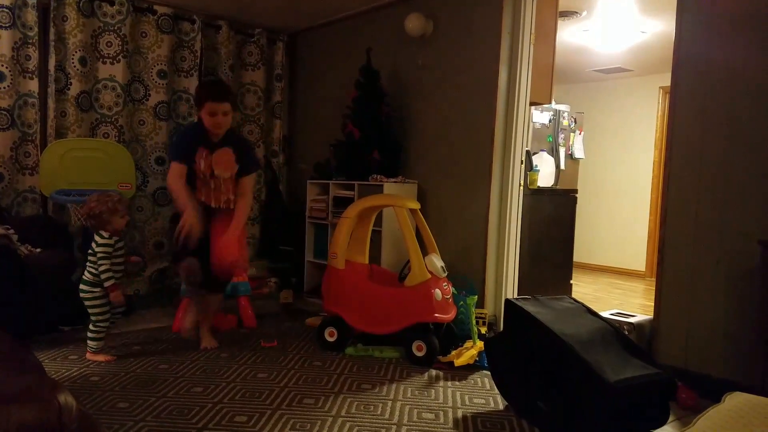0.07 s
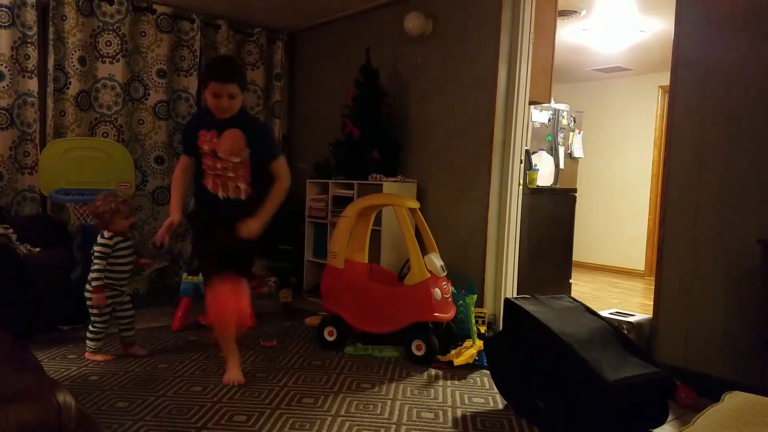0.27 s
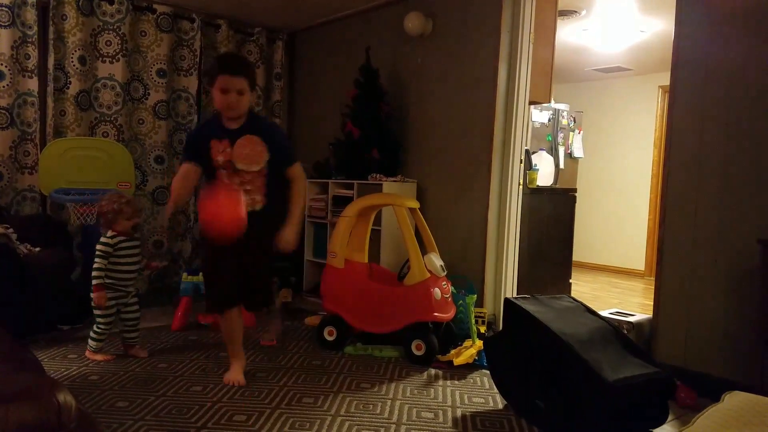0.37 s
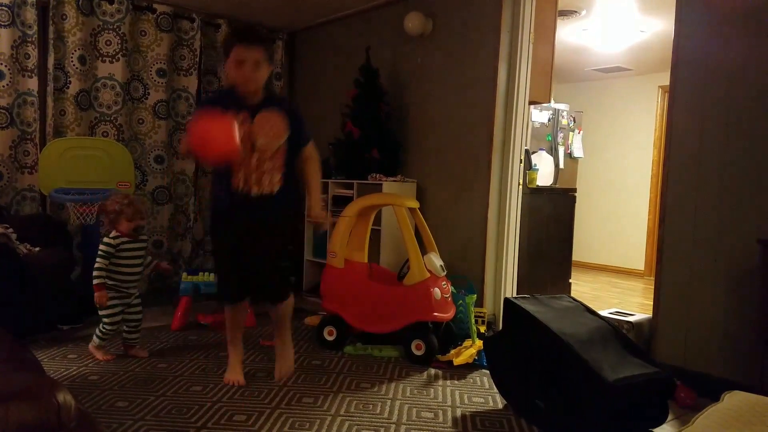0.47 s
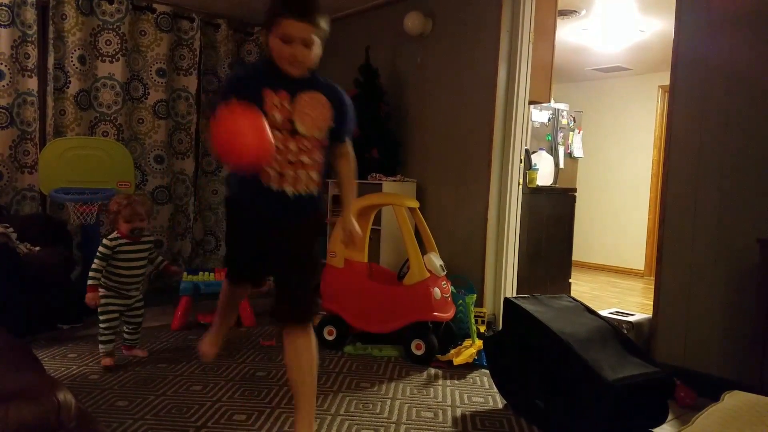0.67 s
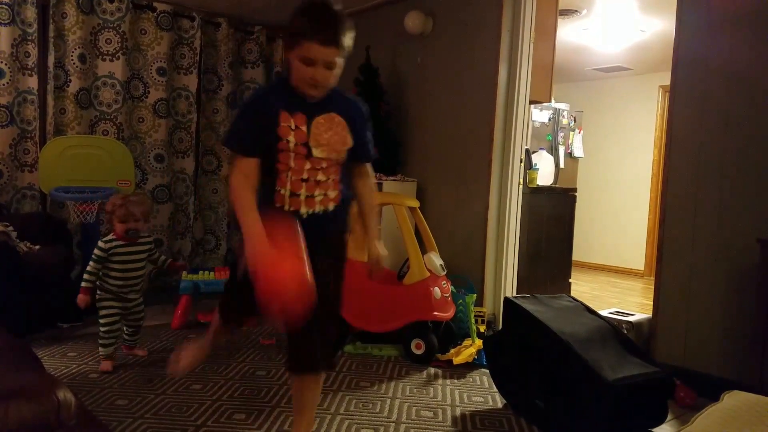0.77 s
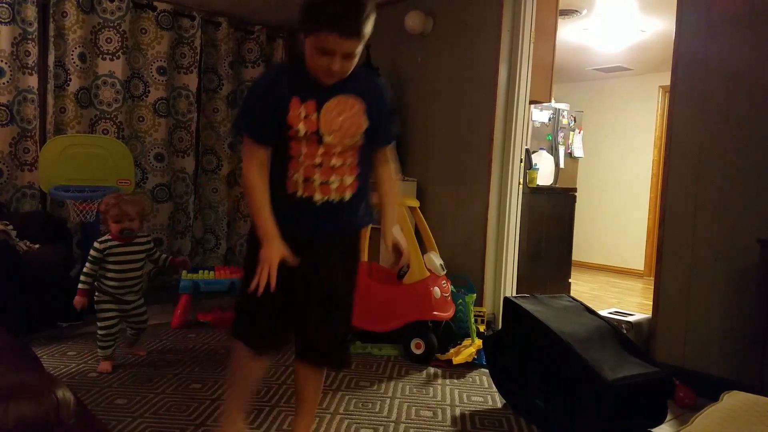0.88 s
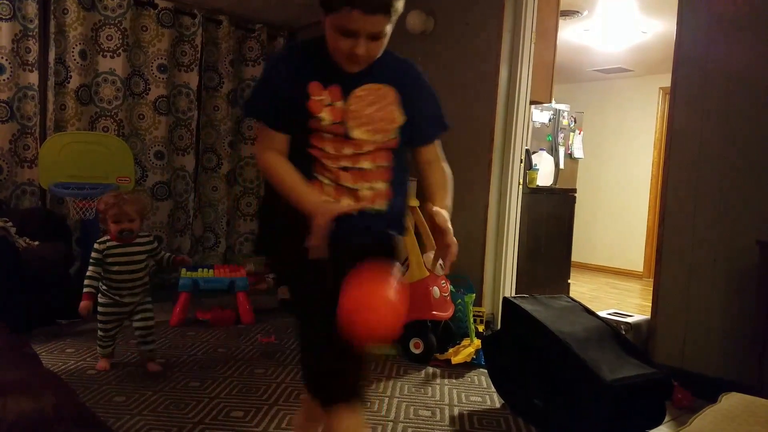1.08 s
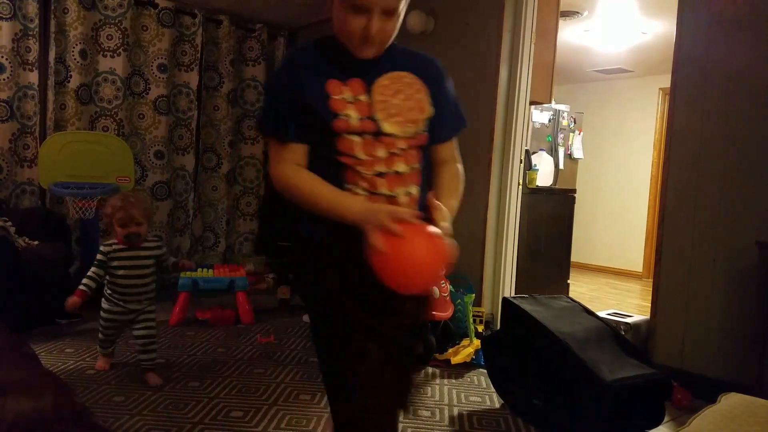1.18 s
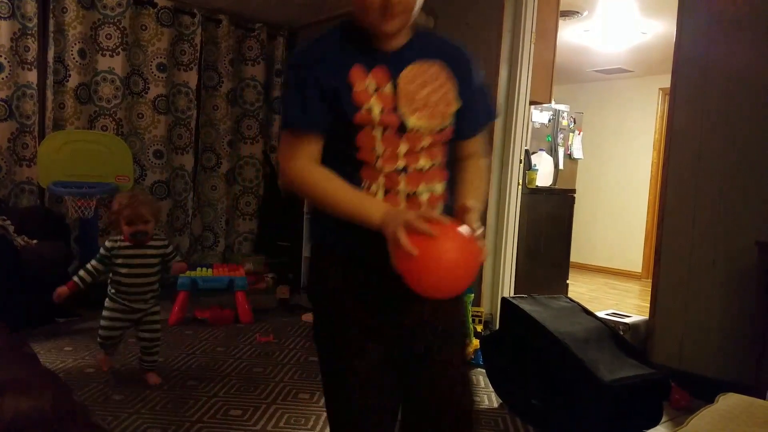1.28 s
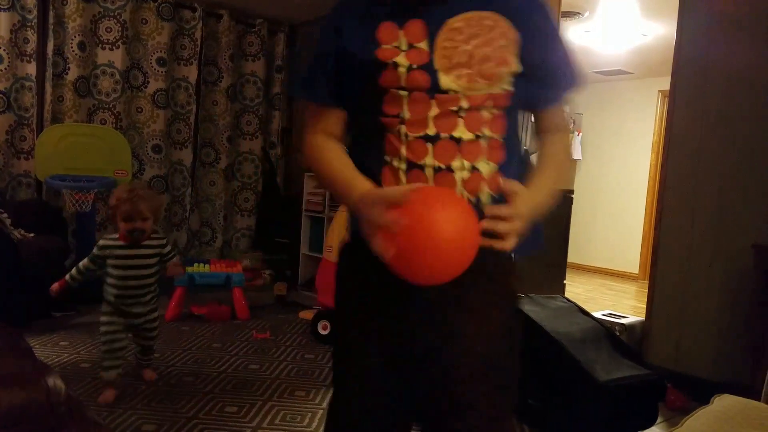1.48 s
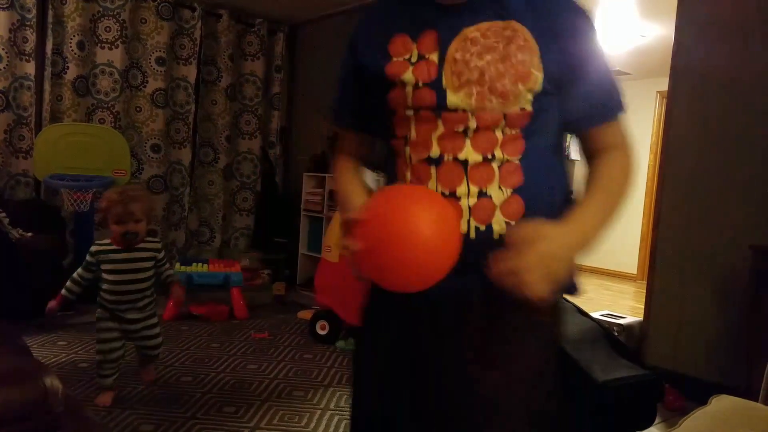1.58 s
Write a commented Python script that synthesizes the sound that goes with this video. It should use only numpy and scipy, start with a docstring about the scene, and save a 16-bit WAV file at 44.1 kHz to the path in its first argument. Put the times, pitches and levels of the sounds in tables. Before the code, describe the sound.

An air-filled ball bounces twice on a carpeted floor, each low thud following a palm slap and booming briefly in a quiet room. Hands then catch it hollowly, amid faint barefoot steps and clothing rustle. The right side sounds brighter.

```python
"""Over a quiet living-room tone, a palm slaps an air-filled rubber ball down, while bare feet and clothes
move softly. The ball strikes the carpet with a thud, the air inside it pings, the low ceiling reflects
the impact and the room booms. A hand meets the rising ball and slaps it down again; after this second
bounce two hands catch it with a hollow sound. A last footfall and rustles of clothing follow.
Throughout, the right microphone hears more treble than the left."""
import sys
import numpy as np
from scipy import signal
from scipy.fft import rfft, irfft, next_fast_len
from scipy.io import wavfile

SR = 44100
rng = np.random.default_rng(int(sys.argv[2]) if len(sys.argv) > 2 else 0)


def digitize_waveform(pressure):
    """Quantize a signal to 16-bit integers and store it at the path in sys.argv[1].

    Rows of a 2-D input are taken as channels; values are limited to [-1, 1].
    """
    field = np.atleast_2d(pressure).T
    bounded = np.clip(field, -1, 1)
    quanta = np.round(bounded * 32767).astype(np.int16)
    wavfile.write(sys.argv[1], SR, quanta)


N = 72765
RESPONSE_SAMPLES = 16384

# Spectra of the steady background, rubbing cloth and a sole on carpet: frequency_hz, gain_db
ROOM_TONE_SPECTRUM = [(20, -36), (50, 0), (120, 1), (250, -3.5), (500, -8.5), (1000, -16), (2500, -16.5),
                      (5000, -27), (10000, -30), (15500, -25.5)]
CLOTH_SPECTRUM = [(100, -6), (400, 3), (1000, -1.5), (2500, 0.5), (4500, -6), (6800, -8.5), (8200, -1),
                  (9500, -12.5), (15000, -7.5)]
SCUFF_SPECTRUM = [(200, 5.5), (3000, -7), (7000, -7.5), (14000, -4.5)]
# Spectra of contact with palm, finger, floor and receiving hands: frequency_hz, gain_db
SLAP_SPECTRUM = [(50, -26), (200, 8), (450, -1), (1100, 0), (2000, -1), (4000, -3), (6500, -12),
                 (10000, -30), (15000, -48)]
TICK_SPECTRUM = [(100, -42), (1500, -8.5), (5000, 2.5), (7400, -2.5), (8400, 4), (9800, -8), (15000, -6.5)]
THUD_SPECTRUM = [(20, -56), (45, -34), (75, -4.5), (130, -2), (300, 4), (700, -1), (1500, -7),
                 (2600, -12.5), (4500, -22.5), (8000, -34.5), (15000, -49)]
CATCH_SPECTRUM = [(50, -26.5), (190, 8.5), (330, 1), (560, 2.5), (1200, -3.5), (2500, -10.5), (4500, -15),
                  (9000, -27), (15000, -7)]
# Hands driving, then receiving the ball: start_s, gain_db, cutoff_hz, push_db, tick_db, ping_db
SLAPS = [(0.001, -8, 2600, -36, -61, 4.5), (0.7413, -16, 4000, -61, -54, 16.5),
         (0.748, -2.5, 5000, -34, -24, 1), (0.7536, -4, 8900, -64, -20.5, -22)]
TOUCHES = [(0.552, -14, 6900, -44, -35.5, -1), (1.1955, -8, 4030, -38.5, -46, -29),
           (1.201, -6, 6050, -32, -24, -7.5)]
# Modes of the air inside the ball: pitch_hz, t60_s, floor_struck_db, hand_struck_db
BALL_MODES = [(1154, 0.07, -41, -40), (1630, 0.23, -56.5, -60), (1741, 0.078, -54, -44),
              (1812, 0.058, -37.5, -68), (2331, 0.099, -52, -71), (2355, 0.19, -64, -53.5),
              (2662, 0.069, -48.5, -53.5), (2897, 0.051, -58, -43), (3570, 0.074, -59, -56),
              (3940, 0.058, -55.5, -73), (4346, 0.11, -65, -54.5)]
# Bare footfalls: start_s, level_db
FOOTFALLS = [(0.02, -48.5), (0.121, -47.5), (0.44, -46), (0.926, -66), (1.25, -48)]
# Gaussian swells of cloth noise: peak_s, sigma_s, level_db
RUSTLES = [(.19, 0.15, -63), (0.478, 0.052, -58.5), (.59, 0.014, -63), (.89, 0.14, -61),
           (1.172, 0.033, -58.5), (1.308, 0.056, -57), (1.612, 0.048, -56)]
# Floor impacts: start_s, gain_db, cutoff_hz, thump_db, echo_delay_s, echo_db, ping_db, room_db
BOUNCES = [(0.2481, 13.5, 7700, -5, 0.0051, -2, -5, -0.5), (0.9817, 11, 3920, 5, 0.0068, -0.5, -4.5, 1)]
# Modes of floor and room: pitch_hz, t60_s, first_bounce_db, second_bounce_db
ROOM_MODES = [(103.3, 0.27, -21, -22.5), (132.7, 0.14, -17, -16), (155.5, 0.26, -29, -26.5),
              (178.4, 0.09, -12.5, -30), (248, 0.11, -49, -24), (280, 0.2, -35, -25),
              (364.6, 0.14, -54, -26), (446.5, 0.15, -20.5, -25.5), (562, 0.24, -32.5, -45),
              (670, 0.12, -30, -48), (780, 0.13, -22.5, -38), (993, .15, -29.5, -32.5),
              (1345, 0.13, -63, -40)]
# Modes of the ball cupped in the hands: pitch_hz, level_db, t60_s
CUPPED_MODES = [(225, -45, 0.2), (340, -41, 0.098), (550.2, -38.5, 0.14), (696, -57, 0.12),
                (943, -46, 0.12), (1230, -51, 0.084)]
# Reverberation time: frequency_hz, t60_s
REVERB_T60 = [(100, 0.34), (400, 0.24), (1000, 0.23), (2500, 0.28), (6000, 0.26), (14000, 0.31)]
# Spectrum of the reverberation: frequency_hz, gain_db
REVERB_SPECTRUM = [(50, 16.5), (130, 12), (250, 0.5), (500, 3), (1000, 1.5), (2000, 5), (5000, 5.5),
                   (14000, 5)]
# Likeness of left and right in the diffuse field: frequency_hz, correlation
COHERENCE = [(60, 1), (150, 0.86), (300, 0.95), (640, 0.2), (1400, -.1), (3000, -0.18), (15000, 0.24)]
# Imbalance of the microphones: frequency_hz, left_minus_right_db
MIC_BALANCE = [(60, 9.5), (110, 1), (200, 0), (380, 1.5), (700, -2), (1290, -5.5), (2380, -7.5),
               (4400, -10.5), (8100, -10), (15000, 0)]


def amp(db):
    """Amplitude grows tenfold with every 20 dB."""
    return 10 ** (np.asarray(db) / 20)


def along(points, hz):
    """Interpolation of a curve on a logarithmic frequency axis."""
    frequencies, values = np.transpose(points)
    return np.interp(np.log(hz + 1), np.log(frequencies + 1), values)


def decay(t, t60):
    """Exponential damping: the level falls 60 dB in t60 seconds."""
    return amp(-60 * t / t60)


def filtered(x, response):
    """Linear filtering multiplies the spectrum by a frequency response."""
    n = x.shape[-1]
    padded = next_fast_len(n + RESPONSE_SAMPLES // 2, True)
    return irfft(rfft(x, padded) * response(np.fft.rfftfreq(padded, 1 / SR)), padded)[..., :n]


def add(out, start_s, x):
    """Superposition: x adds to the pressure in out from start_s on."""
    i = max(0, round(start_s * SR))
    n = min(x.shape[-1], N - i)
    out[:, i:i + n] += x[..., :n]


def pulse(spectrum):
    """A minimum-phase pulse delivers its energy as early as its spectrum allows."""
    hz = np.fft.rfftfreq(RESPONSE_SAMPLES, 1 / SR)
    cepstrum = irfft(np.log(amp(along(spectrum, hz))))
    cepstrum[1:RESPONSE_SAMPLES // 2] *= 2
    cepstrum[RESPONSE_SAMPLES // 2 + 1:] = 0
    return irfft(np.exp(rfft(cepstrum)))


def ring(modes, rise_s):
    """Free vibration is a sum of damped sinusoids, here with a gradual onset."""
    t = np.arange(RESPONSE_SAMPLES) / SR
    vibration = sum(amp(db) * np.sin(2 * np.pi * hz * t) * decay(t, t60) for hz, db, t60 in modes)
    return vibration * (1 - np.exp(-t / rise_s))


def diffuse(spectrum, size):
    """A diffuse field is coherent at two nearby points in the bass, but hardly so in the treble."""
    def mid_and_side(hz):
        angle = np.arccos(np.clip(along(COHERENCE, hz), -1, 1)) / 2
        return amp(along(spectrum, hz)) * [np.cos(angle), np.sin(angle)]
    mid, side = filtered(rng.standard_normal((2, size)), mid_and_side)
    return np.array([mid + side, mid - side])


def noise(spectrum):
    """Diffuse noise normalised to unit rms."""
    x = diffuse(spectrum, N)
    return x / x.std()


def room_tone():
    """Stationary diffuse noise forms a faint, low background."""
    return amp(-57) * noise(ROOM_TONE_SPECTRUM)


def hand_contacts(contacts, impact, direct_db):
    """Impulsive excitation: a hand strikes, a finger ticks, the ball yields and its air rings."""
    out = np.zeros((2, N))
    ceiling_delay_s, ceiling_db = 0.0054, -9
    ping = ring([(hz, db, t60) for hz, t60, _, db in BALL_MODES], rise_s=0.00017)
    tick = pulse(TICK_SPECTRUM)
    push_hz, push_t60_s = 214, 0.034  # the ball yielding in the hands
    push = ring([(push_hz, 0, push_t60_s)], rise_s=0.00041)
    for start_s, gain_db, cutoff_hz, push_db, tick_db, ping_db in contacts:
        softness = signal.butter(2, cutoff_hz, fs=SR, output="sos")
        hit = amp(gain_db) * signal.sosfilt(softness, impact + amp(ping_db) * ping)
        hit += amp(tick_db) * tick
        reflected = reverberation(hit, delay_s=0.0012, span_s=0.008)  # sooner at hand height
        add(out, start_s, amp(direct_db) * hit + reflected + amp(push_db) * push)
        add(out, start_s + ceiling_delay_s, amp(direct_db + ceiling_db) * hit)
    return out


def palm_slaps():
    """A brief force has a broad spectrum: the palm drives the ball down with a smack."""
    return hand_contacts(SLAPS, pulse(SLAP_SPECTRUM), direct_db=-1.5)


def reverberation(x, delay_s, span_s, rise_s=0.0011, wall_count=9, wall_db=-8.5):
    """Early wall reflections merge into a diffuse tail, each band absorbed at its own rate."""
    hz, frame_s, bands = signal.stft(diffuse(REVERB_SPECTRUM, RESPONSE_SAMPLES), SR, nperseg=256)
    t60 = along(REVERB_T60, hz)[:, None]
    equal_energy = np.sqrt(2 * np.log(1000) / (t60 * SR))
    _, tail = signal.istft(bands * decay(frame_s, t60) * equal_energy, SR, nperseg=256)
    age = np.maximum(np.arange(RESPONSE_SAMPLES) / SR - delay_s, 0)
    tail = tail[:, :RESPONSE_SAMPLES] * (1 - np.exp(-age / rise_s))
    walls = np.zeros((2, RESPONSE_SAMPLES))
    for when, left, right in rng.random(size=(wall_count, 3)):
        arrivals_s = delay_s + when * span_s + 0.0004 * np.array([left, right])
        walls[[0, 1], (arrivals_s * SR).astype(int)] += amp(wall_db)
    walls = signal.sosfilt(signal.butter(1, 400, "high", fs=SR, output="sos"), walls)
    return signal.fftconvolve(x[None], tail + walls, axes=1)[:, :RESPONSE_SAMPLES]


def clothes():
    """Friction of cloth makes noise that swells and fades with each movement."""
    t = np.arange(N) / SR
    swells = sum(amp(db) * np.exp(-((t - peak_s) / width_s) ** 2 / 2) for peak_s, width_s, db in RUSTLES)
    return noise(CLOTH_SPECTRUM) * swells


def footfalls(pitch_hz=115, t60_s=0.35):
    """The soft impact of a bare foot excites one low, damped mode."""
    out = np.zeros((2, N))
    for start_s, level_db in FOOTFALLS:
        add(out, start_s, ring([(pitch_hz, level_db, t60_s)], rise_s=0.005))
    return out


def scuff(start_s=0.148, rise_s=0.011, t60_s=0.22):
    """Sliding friction of a sole on the carpet gives one burst of noise."""
    age = np.maximum(np.arange(N) / SR - start_s, 0)
    return amp(-46) * noise(SCUFF_SPECTRUM) * (1 - np.exp(-age / rise_s)) * decay(age, t60_s)


def bounces():
    """Floor impact radiates a rarefaction pulse and excites the modes of ball, floor and room."""
    out = np.zeros((2, N))
    ping = ring([(hz, db, t60) for hz, t60, db, _ in BALL_MODES], rise_s=0.0014)
    thud = pulse(THUD_SPECTRUM)
    thump_hz, thump_t60_s, thump_base_db = 133, 0.0083, -19.5  # the ball flattening on the floor
    for k, bounce in enumerate(BOUNCES):
        start_s, gain_db, cutoff_hz, thump_db, echo_delay_s, echo_db, ping_db, room_db = bounce
        contact = signal.sosfilt(signal.butter(1, cutoff_hz, fs=SR, output="sos"), thud)
        hit = amp(gain_db) * (amp(ping_db) * ping - contact)
        direct = hit + ring([(thump_hz, thump_base_db + thump_db, thump_t60_s)], rise_s=0.0002)
        add(out, start_s, direct)
        add(out, start_s + echo_delay_s, amp(echo_db) * direct)  # ceiling reflection
        add(out, start_s, amp(room_db) * reverberation(hit, delay_s=0.004, span_s=0.014))
        # The point of impact sets how strongly each mode is driven.
        boom = ring([(hz, levels_db[k], t60) for hz, t60, *levels_db in ROOM_MODES], rise_s=0.0081)
        add(out, start_s, boom)
    return out


def receiving_touches():
    """Resonance of the ball cupped in the hands gives each soft contact a hollow sound."""
    impact = pulse(CATCH_SPECTRUM) + ring(CUPPED_MODES, rise_s=0.0073)
    return hand_contacts(TOUCHES, impact, direct_db=-6)


def scene():
    """The pressures of hands, ball, clothes, feet and background add linearly."""
    hands = palm_slaps() + receiving_touches()
    return hands + bounces() + clothes() + footfalls() + scuff() + room_tone()


def record(dry):
    """Two spaced, unequal microphones differ in level and arrival time; both are band-limited."""
    left_lead_s, low_cut_hz, band_limit_hz = 0.00008, 45, 15780
    side = np.array([[0.5], [-0.5]])

    def microphones(hz):
        balance = amp(side * along(MIC_BALANCE, hz))
        balance /= np.sqrt(np.mean(balance ** 2, axis=0))
        low_cut = 1j * hz / (1j * hz + low_cut_hz)
        spacing = np.exp(2j * np.pi * hz * side * left_lead_s)
        return low_cut * balance * spacing * (hz < band_limit_hz)
    return filtered(dry, microphones)


dry = scene()
out = record(dry)
digitize_waveform(out)
```